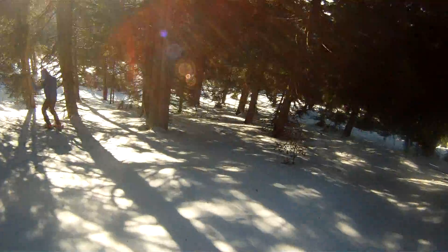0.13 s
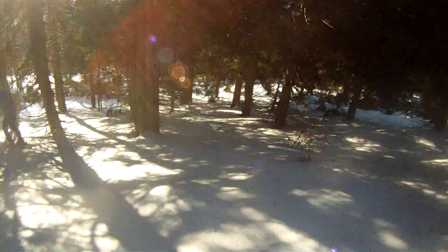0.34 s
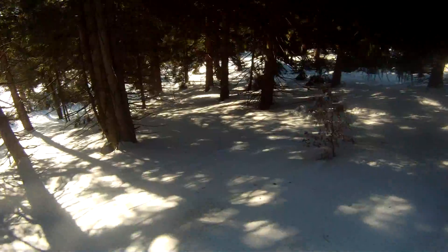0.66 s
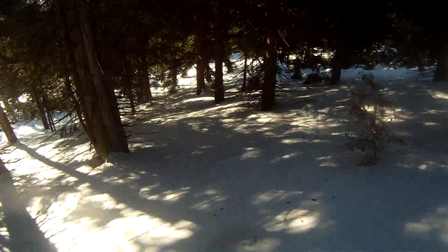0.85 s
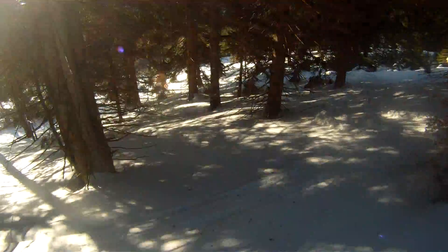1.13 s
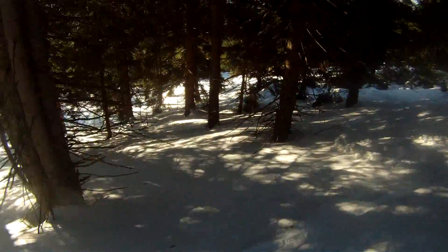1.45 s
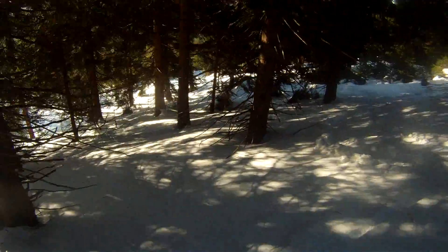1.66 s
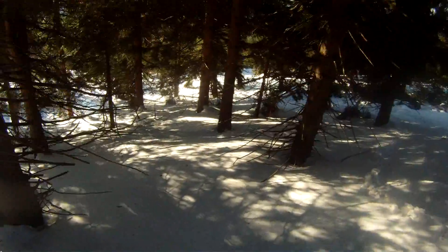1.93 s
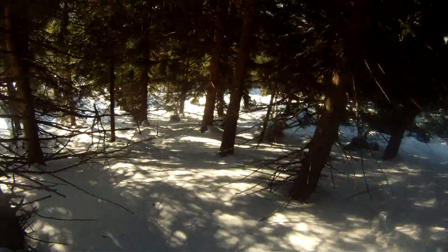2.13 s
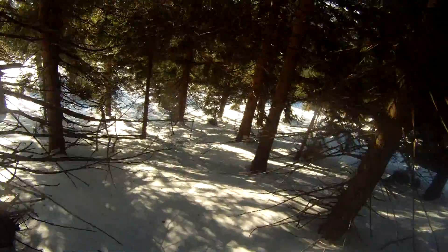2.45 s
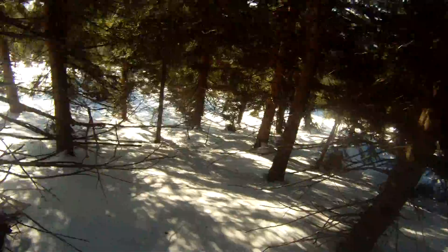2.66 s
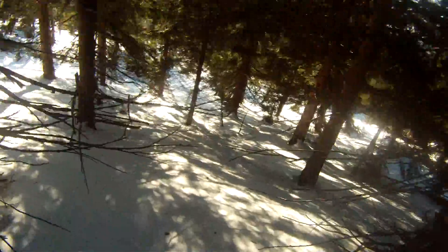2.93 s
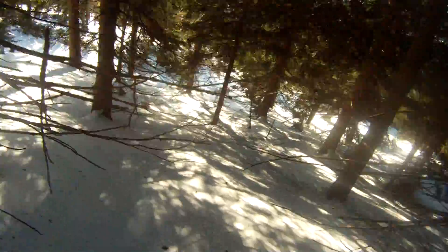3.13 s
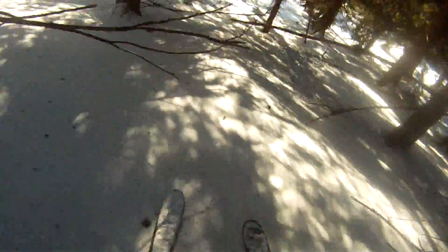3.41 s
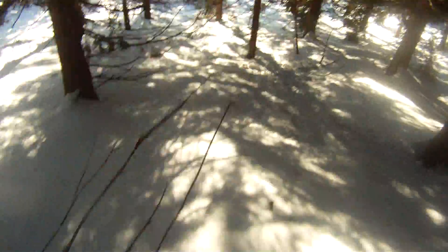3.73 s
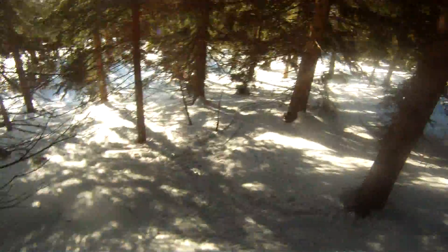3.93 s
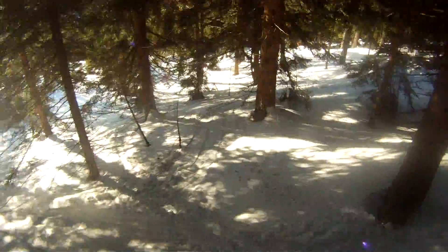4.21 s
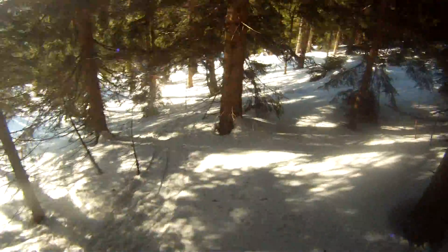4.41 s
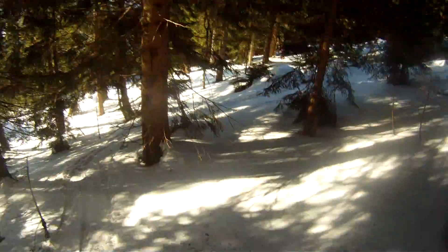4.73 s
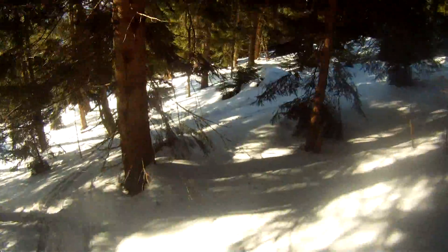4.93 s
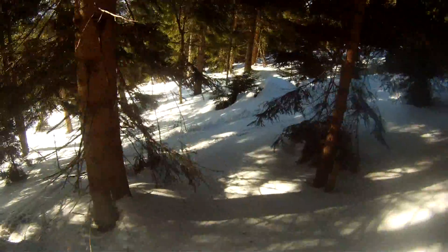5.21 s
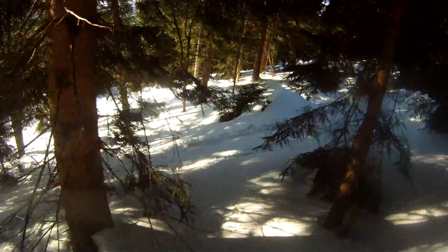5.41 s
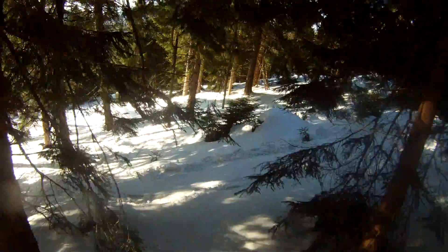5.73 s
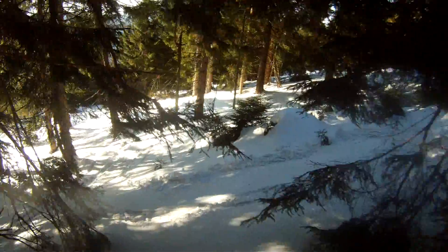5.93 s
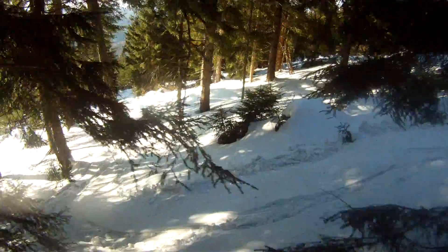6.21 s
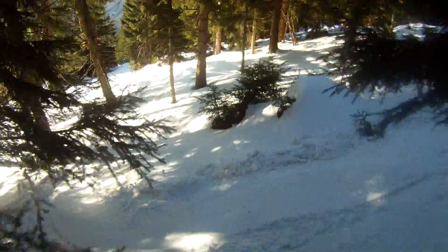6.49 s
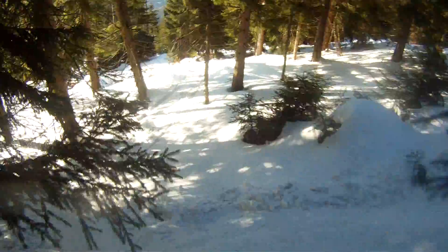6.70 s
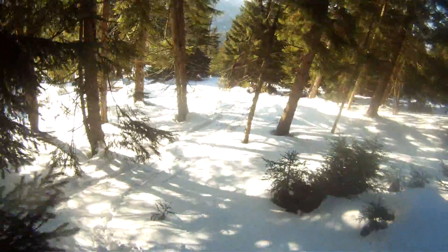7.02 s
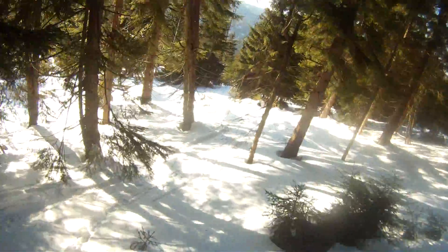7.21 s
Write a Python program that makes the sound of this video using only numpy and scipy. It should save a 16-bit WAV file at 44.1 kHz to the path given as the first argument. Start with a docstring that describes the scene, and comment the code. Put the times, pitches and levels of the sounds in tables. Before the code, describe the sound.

Skis crunch and hiss through snow under low wind rumble; midway dry branches whip the camera case in loud, distorted cracks, then hard turns continue.

```python
"""A skier glides through a snowy forest with a small body-worn camera in a case.
From the start wind rumbles and thumps on the case; skis crunch and hiss in turns, knock over lumps, twigs tick.
Halfway, dry branches whip the case and scrape past: the sound overloads and the gain ducks.
Then come two more hard turns, further knocks and brushing twigs, and light gliding to the end.
The mono camera holds each of its slow samples, which adds a glassy treble throughout."""
import sys
import numpy as np
from scipy import signal
from scipy.fft import rfft, irfft
from scipy.io import wavfile
from scipy.ndimage import uniform_filter1d

SR = 44100
rng = np.random.default_rng(int(sys.argv[2]) if len(sys.argv) > 2 else 0)


def store_wav(level_fs):
    """Save 16-bit WAV to argv[1]."""
    pcm = np.round(np.clip(np.atleast_2d(level_fs), -1, 1) * 32767)
    wavfile.write(sys.argv[1], SR, pcm.T.astype(np.int16))


N = 324576
TIME_S = np.arange(N) / SR

# Levels in the tables apply ahead of the camera's gain control and overload; spectra give shape only.
# Spectrum of wind turbulence on the case. Each row: frequency in Hz, relative density in dB per Hz.
WIND_SPECTRUM = [(10, -1), (28, -3), (65, .5), (130, -1), (200, -4), (300, -8.5), (500, -21), (900, -51),
                 (1500, -42), (3500, -61.5)]
# Wind level before trim and gusts. Each row: time in seconds, level in dB.
WIND_LEVEL = [(0.0, -35), (0.25, -25.5), (0.6, -35), (1.0, -33), (1.15, -29.5), (1.3, -35.5), (1.65, -34.5),
              (2.0, -44), (2.4, -49), (3.15, -41), (3.3, -31.5), (3.62, -32.5), (4.05, -40.5),
              (4.45, -32.5), (4.9, -34.5), (5.3, -44.0), (5.7, -48), (6.4, -40), (7.0, -51.0), (7.36, -43)]
# Gusts thump the case. Each row: centre in seconds, peak in dB, pitch in Hz, half length in seconds.
BUFFETS = [(.265, -20, 122, 0.012), (1.115, -20.5, 56.6, 0.01)]
# Electronic noise of each channel. Each row: frequency in Hz, relative density in dB per Hz.
SELF_NOISE_SPECTRUM = [(200, -14), (900, -13.5), (2800, 4), (4500, -1), (6000, -9), (7500, -8),
                       (10000, -17), (14000, -18)]
# Modes of the plastic case. Each row: frequency in Hz, relative resonance level in dB, t60 in seconds.
CASE_MODES = [(534, 5, 0.022), (640, 2.5, 0.027), (810, -4.5, 0.019), (1000, -2, .018), (1300, -1.5, 0.028),
              (1800, 0.5, 0.012), (2124, -3, 0.0082), (2807, 0, 0.0085), (3600, -12, 0.0089),
              (4500, -6, 0.01), (4590, -14.5, .012), (5610, -18.5, 0.049)]
# Twigs and needles brush past. Each row: start in seconds, length in seconds, level in dB, centre in Hz,
# width in octaves.
BRUSHES = [(.226, 0.0053, -59, 5000, .2), (.744, .009, -56, 4650, 0.31), (.803, .006, -53, 3200, .6),
           (.855, 0.0073, -51.5, 3400, 0.67), (1.146, 0.0047, -42.5, 2770, .3),
           (1.704, .004, -43.5, 4300, .4), (1.857, 0.0039, -39.5, 2920, 0.53), (2.305, 0.03, -52, 1840, .8),
           (3.019, 0.0023, -52, 4850, 0.22), (3.028, 0.016, -53.5, 4900, 0.44),
           (3.084, .007, -59, 4900, .25), (3.198, 0.015, -55.5, 4700, 0.47),
           (3.492, 0.026, -44, 1540, 0.69), (3.552, 0.016, -38, 2450, 0.73),
           (4.001, 0.0086, -45.5, 1410, 0.91), (4.044, .039, -53, 5050, 0.29),
           (4.0725, .0054, -33.5, 3350, 0.35), (4.147, 0.015, -43.5, 2530, .55),
           (4.206, 0.007, -35.5, 3040, 0.43), (6.024, 0.018, -50.5, 2800, .7),
           (6.109, .013, -46, 2320, 0.44), (6.145, 0.0093, -43.5, 2540, 0.37),
           (6.172, 0.007, -43.5, 2600, 0.56), (6.227, 0.011, -49.5, 2400, .83),
           (6.722, .008, -55, 2000, 0.74), (7.156, 0.037, -56.5, 4900, .3), (7.21, 0.0044, -51, 2200, 1)]
# Spectrum of packing snow. Each row: frequency in Hz, relative density in dB per Hz.
CRUNCH_SPECTRUM = [(40, -27), (110, -13.5), (200, -3), (330, 0.26), (500, -0.5), (640, -8.5), (800, -17),
                   (1000, -26.5), (1500, -35), (4000, -69.5)]
# Light hiss of flat skis. Each row: frequency in Hz, relative density in dB per Hz.
HISS_SPECTRUM = [(300, -24), (900, -14.5), (1250, -9.5), (1650, -8), (2200, -1.5), (2750, 1.5),
                 (3250, -4.5), (3700, -4.5), (4150, -13), (4700, -9), (5400, -14), (6000, -16)]
# Darker scrape of biting edges. Each row: frequency in Hz, relative density in dB per Hz.
CARVE_SPECTRUM = [(300, -21), (950, -7), (1250, -2), (1600, -6.5), (2250, 3.5), (2750, 5), (3250, -6.5),
                  (3700, -10.5), (4150, -15), (4700, -16.5), (6000, -24)]
# Hiss between turns, before trim and fluctuation. Each row: time in seconds, level in dB.
GLIDE_LEVEL = [(0, -62), (.25, -53.5), (.75, -61), (1.3, -54.5), (2.2, -58), (2.45, -62), (3.1, -61),
               (3.5, -50.5), (4.1, -52), (4.55, -47.5), (5.3, -55.5), (5.65, -61), (6.1, -54.5), (6.4, -57),
               (7.35, -54.5)]
# Skis set on edge. Each row: start in seconds, hardest push in seconds, let-go in seconds, crunch in dB,
# scrape in dB, both at the hardest push before trim and fluctuation.
TURNS = [(0.334, 0.477, 0.517, -31.5, -47.5), (1.083, 1.147, 1.15, -42.5, -54.5),
         (1.376, 1.587, 1.91, -26, -39), (2.02, 2.13, 2.56, -43, -71), (4.599, 4.81, 5.05, -26.5, -40),
         (4.995, 5.115, 5.24, -29, -42.5), (6.0, 6.16, 6.25, -46, -57)]
# An edge catches in a turn. Each row: centre in seconds, half length in seconds, extra scrape in dB.
BITES = [(.463, 0.041, 2), (1.407, .006, 4), (1.604, .007, 7), (1.638, 0.024, 5.5), (1.78, 0.0027, 6),
         (4.666, 0.0094, 6), (4.806, 0.015, 6), (4.933, 0.014, 4.5), (5.123, 0.018, 6)]
# Skis knock on large lumps. Each row: centre in seconds, peak in dB, half length in seconds.
KNOCKS = [(0.237, -29, 0.0017), (0.579, -30, 0.0017), (.809, -29, .0025), (1.212, -32, .0016),
          (1.612, -15, 0.0039), (1.751, -13.5, .0013), (1.79, -14, 0.0014), (1.821, -19, 0.0015),
          (1.898, -16, 0.0012), (3.876, -11.5, 0.0012), (3.885, -24, 0.0044), (3.913, -15.5, 0.0013),
          (3.939, -29, 0.0088), (3.954, -14.5, 0.0025), (3.9642, -14.5, 0.0012), (4.578, -22, .0016),
          (4.708, -15.5, 0.0016), (4.795, -15, .0025), (4.937, -15.5, 0.0013), (5.092, -17.5, 0.0018),
          (5.24, -26.5, 0.0014), (5.482, -29.5, 0.0013), (6.227, -29.5, .002), (7.267, -31.5, 0.0016)]
# A branch drags on the case between and after blows. Each row: start in seconds, length in seconds,
# level in dB, centre in Hz, width in octaves.
DRAGS = [(3.664, 0.05, -15.5, 640, .13), (3.686, 0.048, -15, 1100, 0.48), (3.692, 0.044, -18.5, 2200, .36),
         (3.709, .003, -17.5, 4900, .25), (3.792, 0.086, -30, 3430, 0.56), (3.8, 0.018, -34, 2800, 0.18),
         (3.836, 0.024, -30.5, 2460, 0.07), (3.852, 0.0062, -36, 3290, 0.16),
         (3.88, 0.089, -39.5, 2970, 0.72)]
# Branches whip the case. Each row: start in seconds, level in dB, contact in seconds, dying time in seconds,
# first ring in Hz, its level in dB re the blow, second ring in Hz, its level in dB re the blow.
WHIPS = [(3.6515, 3, 0.0046, 0.0027, 1268, -1, 3010, 2.5), (3.678, 5, 0.002, 0.0023, 1160, 9.5, 2990, -7),
         (3.693, -11, 0.002, 0.0023, 1700, -0.5, 2820, -6.5),
         (3.701, -14.5, .001, 0.0022, 2070, 1, 1200, -8.5),
         (3.728, -12.5, 0.0072, 0.0072, 1030, 1.5, 2030, -7.5),
         (3.7612, -3.5, 0.0025, 0.0024, 1894, 8, 3880, 1),
         (3.7826, -6.5, 0.0033, 0.003, 1803, 4.5, 1340, -30),
         (3.8962, -30.5, 0.00089, 0.0022, 3680, 12, 2980, 20.5)]

HOLD_HZ, EDGE_HZ = 12000, 15650  # slow sample rate, upper band limit
SELF_NOISE_DB = -76
# Edge pressure: the edge sets, builds to the hardest push, eases, lets go
SET_S, BUILD_DB_PER_S, EASE_DB_PER_S, LET_GO_S = 0.04, 16.5, 33.5, 0.072
# Between turns the crunch follows the speed, as the wind does
CRUISE_WIND_DB, CRUISE_CRUNCH_DB, CRUNCH_DB_PER_WIND_DB = -39.5, -44, 0.57
KNOCK_HZ = 450
# Chance small lumps; mean peak re the crunch level
LUMPS_PER_S, LUMP_RE_CRUNCH_DB, LUMP_SPREAD_DB, LUMP_HALF_S = 7, 7.5, 4, 0.0016
# Chance needle ticks
NEEDLES_PER_S, NEEDLE_S, NEEDLE_DB, NEEDLE_SPREAD_DB = 2, 0.0038, -63, 1
NEEDLE_HZ, NEEDLE_OCTAVES = 4900, 0.25


def gain_of(db):
    """Decibels to amplitude."""
    return 10 ** (np.asarray(db) / 20)


def evened(x):
    """Scales to an rms of one."""
    return x / np.sqrt(np.mean(x ** 2) + 1e-20)


def add(mix, start_s, sound):
    """Mixes a sound in at a time, in place."""
    part = mix[max(round(start_s * SR), 0):][:len(sound)]
    part += sound[:len(part)]


def curve(rows):
    """Joins (s, value) rows by straight lines."""
    return np.interp(TIME_S, *np.transpose(rows))


def colour(x, points):
    """Filters by a spectrum of (Hz, dB) points; rms one."""
    hz, db = np.transpose(points)
    bins_hz = np.fft.rfftfreq(len(x), 1 / SR)
    gain = gain_of(np.interp(np.log(bins_hz + 1), np.log(hz), db))
    return evened(irfft(rfft(x) * gain, len(x)))


def flutter(rate_hz):
    """Smooth random fluctuation of rms one, fading out above a rate."""
    bins_hz = np.fft.rfftfreq(N, 1 / SR)
    band = (bins_hz > rate_hz / 8) / (1 + (bins_hz / rate_hz) ** 4)
    return evened(irfft(rfft(rng.standard_normal(N)) * band, N))


def chance_times(per_s):
    """Moments that fall at random, at a mean rate."""
    return TIME_S[rng.random(N) < per_s / SR]


def grains(per_s, spread_db):
    """Random clicks of either sign, most small and a few large, as from breaking crystals."""
    size = gain_of(spread_db * np.minimum(rng.exponential(1, N), 4))
    sign = rng.choice([-1, 1], N)
    return evened(size * sign * (rng.random(N) < per_s / SR))


def thumps(rows):
    """Dull pushes: short cosines in a bell envelope, from rows of (s, dB, Hz, half length s)."""
    out, t = np.zeros(N), np.arange(-1024, 1024) / SR
    for centre_s, db, hz, half_s in rows:
        bell = np.exp(-(t / half_s) ** 2)
        add(out, centre_s + t[0], gain_of(db) * bell * np.cos(2 * np.pi * hz * t))
    return out


def wind(trim_db=1.0, gust_db=1.07):
    """Lumpy turbulence on the case: coloured noise with a fluctuating level."""
    air = colour(rng.standard_normal(N), WIND_SPECTRUM)
    return air * gain_of(curve(WIND_LEVEL) + trim_db + gust_db * flutter(rate_hz=6.9))


def case(x, lowest_hz=380):
    """Rings the modes of the case, which is too small to radiate bass."""
    t = np.arange(2048) / SR
    ring = np.zeros(len(t))
    for k, (hz, db, t60_s) in enumerate(CASE_MODES):
        decay = gain_of(db - 60 * t / t60_s) / t60_s  # division evens the resonance peaks
        ring += (-1) ** k * decay * np.cos(2 * np.pi * hz * t)
    highpass = signal.butter(2, lowest_hz, "high", fs=SR, output="sos")
    return signal.fftconvolve(x, signal.sosfilt(highpass, ring))[:len(x)]


def rub(rows, slips_per_s, rise_s, dying_s):
    """Wood slips over the case: dense clicks in a band, higher for finer twigs."""
    out, t = np.zeros(N), np.arange(8192) / SR
    octave = np.log2(np.fft.rfftfreq(len(t), 1 / SR) + 1)
    slips = grains(slips_per_s, spread_db=3.0)
    slips = evened(case(slips)) + 1.3 * slips  # case ring plus direct clicks
    for start_s, length_s, db, hz, octaves in rows:
        band = np.exp(-0.5 * ((octave - np.log2(hz)) / octaves) ** 2)
        clicks = slips[min(round(start_s * SR), N - len(t)):][:len(t)]
        touch = np.minimum(t / rise_s, 1) * np.exp(-np.maximum(t - length_s, 0) / dying_s)
        scrape = irfft(rfft(clicks) * band) * touch
        add(out, start_s, gain_of(db) * scrape * np.linalg.norm(touch) / np.linalg.norm(scrape))
    return out


def needles():
    """Rows for faint high brushes at random moments."""
    rows = []
    for start_s in chance_times(NEEDLES_PER_S):
        db = NEEDLE_DB + NEEDLE_SPREAD_DB * rng.standard_normal()
        rows.append((start_s, NEEDLE_S, db, NEEDLE_HZ, NEEDLE_OCTAVES))
    return rows


def pressure(start_s, push_s, end_s):
    """Edge pressure through one turn, one at the hardest push."""
    build_db = -BUILD_DB_PER_S * np.maximum(push_s - TIME_S, 0)
    ease_db = -EASE_DB_PER_S * np.maximum(TIME_S - push_s, 0)
    edge_set = np.clip((TIME_S - start_s) / SET_S, 0, 1)
    let_go = np.exp(-np.maximum(TIME_S - end_s, 0) / LET_GO_S)
    return gain_of(build_db + ease_db) * edge_set * let_go


def snow_levels():
    """Levels in dB of crunch and scrape: gliding and turns summed in power."""
    speed_db = curve(WIND_LEVEL) - CRUISE_WIND_DB
    crunch = gain_of(CRUISE_CRUNCH_DB + CRUNCH_DB_PER_WIND_DB * speed_db)
    scrape = gain_of(curve(GLIDE_LEVEL))
    for start_s, push_s, end_s, crunch_db, scrape_db in TURNS:
        press = pressure(start_s, push_s, end_s)
        crunch = np.hypot(crunch, gain_of(crunch_db) * press)
        scrape = np.hypot(scrape, gain_of(scrape_db) * press)
    return 20 * np.log10(crunch), 20 * np.log10(scrape)


def knocks(packing_db):
    """Large lumps knock the skis; small ones are as loud as the snow is pressed."""
    large = thumps((s, db, KNOCK_HZ, half_s) for s, db, half_s in KNOCKS)
    small_rows = []
    for s in chance_times(LUMPS_PER_S):
        db = LUMP_RE_CRUNCH_DB + LUMP_SPREAD_DB * rng.standard_normal()
        small_rows.append((s, db, KNOCK_HZ, LUMP_HALF_S))
    return large + thumps(small_rows) * gain_of(packing_db)


def skis(packing_db, scrape_db, bite_db=-49, bite_range_db=4.0, crunch_share=0.57, uneven_db=0.8):
    """Snow packs in small collapses under the skis and sprays off the edges; one chatter shakes both."""
    chatter = flutter(rate_hz=58)
    ground_db = uneven_db * flutter(rate_hz=12)
    catch_db = sum(db * np.exp(-((TIME_S - s) / half_s) ** 2) for s, half_s, db in BITES)
    crunch_db = packing_db + ground_db + crunch_share * catch_db - 0.3 + 1.1 * chatter
    crunch = colour(grains(per_s=2400, spread_db=3.0), CRUNCH_SPECTRUM) * gain_of(crunch_db)
    edge_db = scrape_db + ground_db + catch_db
    # the harder the edge presses, the more the fine hiss gives way to a coarse scrape
    biting = 1 / (1 + np.exp((bite_db - edge_db) / bite_range_db))
    glide = colour(grains(per_s=9000, spread_db=2.0), HISS_SPECTRUM) * gain_of(2.5 + 0.9 * chatter)
    carve = colour(grains(per_s=1600, spread_db=2.5), CARVE_SPECTRUM) * gain_of(-1.5 + 2.4 * chatter)
    edges = np.sqrt(1 - biting) * glide + np.sqrt(biting) * carve
    return crunch + gain_of(edge_db) * edges


def whips(rise_s=0.00092, strike=16):
    """A branch strikes the case, rattles while it touches, and rings briefly with two bending modes."""
    out, t = np.zeros(N), np.arange(2048) / SR
    for start_s, db, contact_s, dying_s, first_hz, first_db, second_hz, second_db in WHIPS:
        touch = np.minimum(t / rise_s, 1) * np.exp(-np.maximum(t - contact_s, 0) / dying_s)
        rattle = case(rng.standard_normal(len(t)) * touch + strike * (t == 0))
        rattle *= np.linalg.norm(touch) / np.linalg.norm(rattle)
        first = gain_of(first_db) * np.sin(2 * np.pi * first_hz * t)
        second = gain_of(second_db) * np.sin(2 * np.pi * second_hz * t)
        add(out, start_s, gain_of(db) * (rattle + (first + second) * touch))
    return out


def scene():
    """Everything reaches one microphone, copied to two channels; snow gives no echo."""
    packing_db, scrape_db = snow_levels()
    air = wind() + thumps(BUFFETS)
    twigs = rub(BRUSHES + needles(), slips_per_s=1400, rise_s=0.00083, dying_s=0.0014)
    snow = skis(packing_db, scrape_db) + knocks(packing_db)
    branches = whips() + rub(DRAGS, slips_per_s=1700, rise_s=0.003, dying_s=0.004)
    mono = air + twigs + snow + branches
    return np.array([mono, mono])


def gain_control(x, limit_db=-10.0, recovery_db_per_s=62, lag_s=0.0048):
    """The gain drops a moment after a loud blow and creeps back."""
    power = abs(uniform_filter1d((x ** 2).mean(0), size=256))
    power_db = 10 * np.log10(power + 1e-12)
    creep_db = TIME_S * recovery_db_per_s
    held_db = np.maximum.accumulate(power_db + creep_db) - creep_db  # peaks that fall at a steady rate
    over_db = np.maximum(held_db - limit_db, 0)
    smooth_db = uniform_filter1d(over_db, size=256, origin=127)
    return x / gain_of(np.interp(TIME_S - lag_s, TIME_S, smooth_db))


def record(dry):
    """Gain control, slow sampling and overload; holding each sample mirrors the sound into the treble."""
    slow = signal.resample_poly(gain_control(dry), HOLD_HZ, SR, axis=1)
    slow = slow / (1 + slow ** 4) ** (1 / 4)  # soft overload towards full scale
    steps = np.repeat(slow, 4, axis=1)
    held = signal.resample_poly(steps, SR, 4 * HOLD_HZ, axis=1)[:, :N]
    hiss = np.array([colour(rng.standard_normal(N), SELF_NOISE_SPECTRUM) for _ in held])
    noisy = held + gain_of(SELF_NOISE_DB) * hiss
    lowpass = signal.firwin(511, EDGE_HZ, window=("kaiser", 8), fs=SR)
    return signal.oaconvolve(noisy, lowpass[None], "same")


dry = scene()
out = record(dry)
store_wav(out)
```